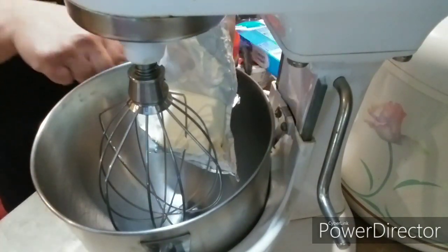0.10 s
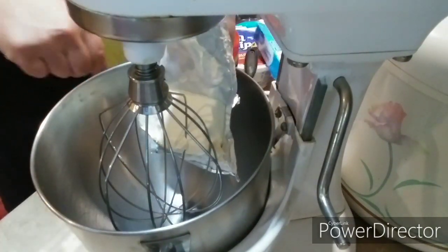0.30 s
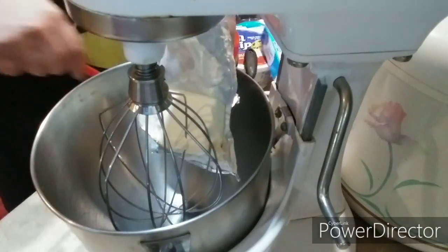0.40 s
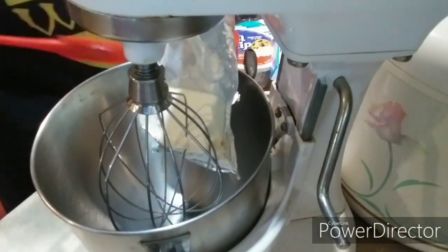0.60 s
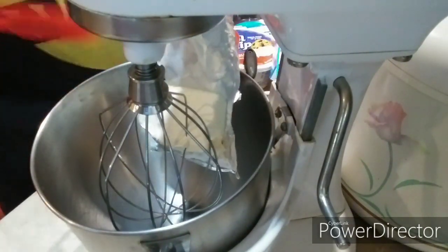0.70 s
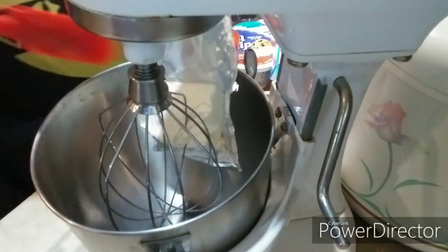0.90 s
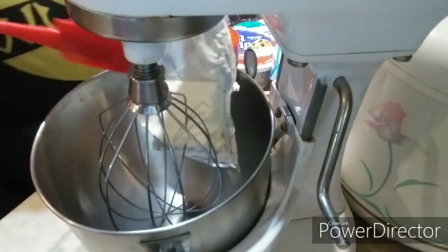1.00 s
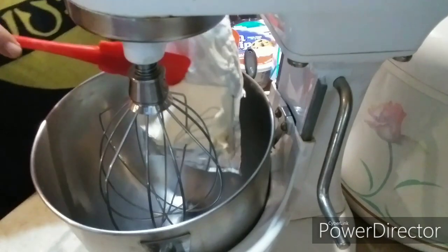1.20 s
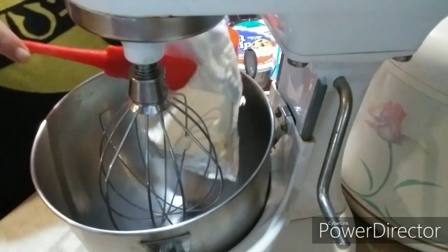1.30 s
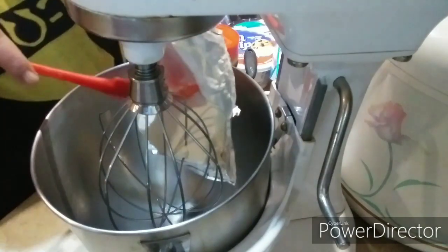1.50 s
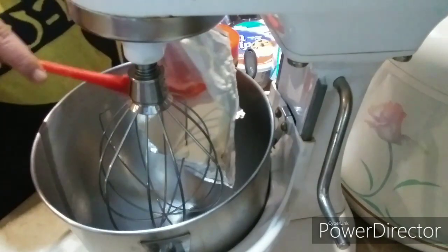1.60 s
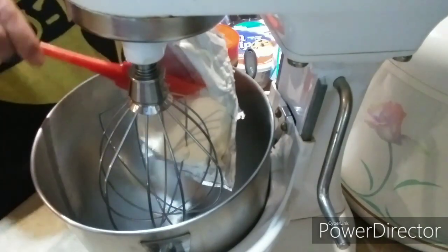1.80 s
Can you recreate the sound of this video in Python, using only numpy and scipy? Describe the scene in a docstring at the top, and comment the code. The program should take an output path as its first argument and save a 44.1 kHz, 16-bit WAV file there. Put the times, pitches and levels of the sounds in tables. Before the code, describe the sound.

Metal utensil set down with two ringing knocks, followed by foil crinkles, small taps and scraping

```python
"""Utensil, worktop and foil wrapper

A steel utensil is put down on a kitchen worktop: one end lands, then the other, each with a rattle and a thin ring.
A spatula pokes into a foil wrapper of soft cheese over a mixing bowl, with small taps, crinkles and a sliding scrape.
Decaying sine modes give the rings, coloured noise bursts the knocks and taps, random impulses and hiss the scrape.
A small room answers; the close microphone has a bright port resonance and a limiter."""
import sys
import numpy as np
from scipy import signal
from scipy.fft import rfft, irfft, next_fast_len
from scipy.io import wavfile
from scipy.ndimage import uniform_filter1d, minimum_filter1d

SR = 44100
rng = np.random.default_rng(int(sys.argv[2]) if len(sys.argv) > 2 else 0)


def wav_record(signal):
    """Record a signal, one row per channel, as 16-bit PCM in the file named by sys.argv[1]."""
    frames = np.transpose(np.atleast_2d(signal))
    bounded = np.clip(frames, -1, 1)
    # unit amplitude maps onto the largest positive 16-bit level
    quanta = np.round(bounded * 32767).astype(np.int16)
    wavfile.write(sys.argv[1], SR, quanta)


N = 79380


def undb(db):
    """Decibel law: an amplitude ratio is 10 to the power of level / 20."""
    return 10 ** (np.asarray(db) / 20)


def add(out, start_s, x):
    """Superposition: sum x into out from a start time on."""
    i = int(start_s * SR)
    out[i:i + len(x)] += x[:len(out) - i]


def fade(t, t60_s):
    """Exponential damping: amplitude is 60 dB down after t60."""
    return np.exp(-np.log(1000) * t / t60_s)


def colour(x, points):
    """Minimum-phase filtering: a causal response whose magnitude passes through (f/Hz, level/dB) points."""
    size = 2 * next_fast_len(len(x))
    hz, db = np.array(points, float).T
    f = np.maximum(np.arange(size // 2 + 1) * SR / size, 1)
    level_db = np.interp(np.log(f), np.log(hz), db)
    cepstrum = irfft(np.log(undb(level_db)))
    # folding the cepstrum onto positive times makes the filter causal
    cepstrum[1:size // 2] *= 2
    cepstrum[size // 2 + 1:] = 0
    response = np.exp(rfft(cepstrum))
    return irfft(rfft(x, size) * response)[:len(x)]


def burst(t, t60_s):
    """Diffuse decay: exponentially damped noise, scaled to unit energy."""
    x = rng.standard_normal(len(t)) * fade(t, t60_s)
    return x / np.sqrt(np.sum(x ** 2))


def ring(t, modes, end, rise_s):
    """Modal superposition: damped sines, weighted by the end that lands, with a gradual onset."""
    waves = np.zeros(len(t))
    for k, (hz, *end_db, t60_s) in enumerate(modes):
        sign = (-1) ** k
        waves += sign * undb(end_db[end]) * np.sin(2 * np.pi * hz * t) * fade(t, t60_s)
    return waves * (1 - np.exp(-t / rise_s))


def slips(per_s):
    """Stick-slip friction: randomly timed impulses of random size and sign, scaled to unit level."""
    happens = rng.random(N) < per_s / SR
    x = happens * rng.standard_normal(N)
    return x / np.std(x)


# spectrum of the background air noise: f/Hz, relative level/dB
AIR_SPECTRUM = [(25, -8), (55, -1), (100, -6.5), (280, 1), (450, 0), (700, -5), (2000, -10), (6000, -20.5),
                (9000, -20.5), (16000, -18.5)]
AIR_DB = -51.5


def room_air():
    """Stationary noise: the quiet, steady background of the kitchen."""
    return undb(AIR_DB) * colour(rng.standard_normal(N), AIR_SPECTRUM)


# strength of the sliding stroke: t/s, level before colouring/dB
STROKE = [(0, -67), (.1, -68.5), (.15, -57.5), (.4, -49), (.66, -57.5), (0.758, -65), (.9, -58), (.97, -61),
          (1.07, -61), (1.21, -53.5), (1.298, -67), (1.359, -45), (1.41, -40.5), (1.51, -43), (1.57, -51),
          (1.62, -55.5), (1.7, -55.5), (1.8, -56.5)]
# spectrum of the sliding friction: f/Hz, gain/dB
FRICTION_SPECTRUM = [(60, -25.5), (180, -4.5), (350, 8), (700, -11), (1030, 5), (1350, -12), (2000, -0.5),
                     (3000, -6), (6400, -8.5), (8700, 1.5), (12000, -9.5), (16000, -11)]
# spectrum of the foil crackle: f/Hz, gain/dB
CRACKLE_SPECTRUM = [(100, -16.5), (350, 4), (1000, 1), (2200, -0.5), (4000, 8), (6500, -10.5), (9000, -7.5),
                    (16000, -18)]
SLIPS_PER_S, HISS_DB = 7500, 3.5  # hiss level relative to the slips
CRACKLES_PER_S, CRACKLE_DB, CRACKLE_T60_S = 390, -10.5, 0.0074


def scrape():
    """Friction excitation: fine slips, hiss and coarser foil crackles, all swelling with the stroke."""
    friction = slips(SLIPS_PER_S) + undb(HISS_DB) * rng.standard_normal(N)
    friction /= np.std(friction)
    one_crackle = burst(np.arange(SR // 20) / SR, CRACKLE_T60_S)
    crackle = signal.fftconvolve(slips(CRACKLES_PER_S), one_crackle)[:N]
    stroke_t, stroke_db = np.array(STROKE).T
    stroke = undb(np.interp(np.arange(N) / SR, stroke_t, stroke_db))
    sliding = colour(friction * stroke, FRICTION_SPECTRUM)
    return sliding + undb(CRACKLE_DB) * colour(crackle * stroke, CRACKLE_SPECTRUM)


# frequencies at which each tap's spectrum is given: f/Hz
TAP_BANDS = [320, 1000, 2200, 6000, 9000]
# taps and crinkles of spatula and wrapper: t/s, then gain/dB at each of TAP_BANDS
TAP_EVENTS = [(0.129, -3, -2, -21, -46, -47), (0.1358, -3, 7, 1.5, -17, -22),
              (0.816, -23, -9.5, -21, -49, -50), (0.8452, -16.5, 3, -1, -19.5, -26),
              (0.903, -16, -8.5, -9.5, -29, -47), (0.922, -9.5, -50, -29, -36, -24),
              (1.001, -26, -32, -22, -29.5, -19.5), (1.0878, -44, -37, -18, -10.5, -4),
              (1.091, -14, 3.5, -10.5, -38, -21.5), (1.1104, -16.5, -28.5, -10, -5.5, 4),
              (1.1142, -9.5, -8, -9.5, -22, -6), (1.187, -11, -15.5, -16, -60, -44),
              (1.240, -15.5, -0.5, -24, -54, -41), (1.248, -4, -37, -4, -15, -14.5),
              (1.342, -19, -13.5, -5.5, -24, -20.5), (1.362, -11.5, -1, -19.5, -26, -45),
              (1.4227, 6.5, 2, 9.5, -1.5, 0.5), (1.438, -5, -5, -15, -12, -17),
              (1.527, -20, -6, 0, -21.5, -33), (1.572, -11.5, -1, -1.5, -20, -52),
              (1.609, -8.5, -22, -31, -41, -48), (1.624, -12, -3.5, -27, -37, -45),
              (1.633, -20, -24, -7, -36, -42), (1.641, -5.5, -7.5, -8, -34, -44),
              (1.6508, 0, 6, 6, -8.5, -5.5), (1.768, -27, -16, -21.5, -31, -24.5)]
# modes of the bowl: f/Hz, level relative to the tap at that pitch/dB, T60/s
BOWL_MODES = [(243.5, -47, 0.16), (370.1, -36.5, 0.099), (1065, -45.5, 0.14), (1625, -49.5, 0.14),
              (2083, -49, 0.14)]
BOWL_RISE_S = 0.002
TAP_TOP_DB = -18  # at 16 kHz, relative to the highest band
TAP_SNAP_DB, TAP_BODY_DB, TAP_T60_S = -17.5, -3, 0.032
ROOM_DB, ROOM_T60_S = -11.5, 0.21
TAP_LOW_CUT_HZ = 164


def taps():
    """Impulse excitation: a snap, a damped rattle and the room's tail, coloured by what is touched; a faint bowl."""
    out, t = np.zeros(N), np.arange(SR // 2) / SR
    for start_s, *band_db in TAP_EVENTS:
        hit = undb(TAP_BODY_DB) * burst(t, TAP_T60_S) + undb(ROOM_DB) * burst(t, ROOM_T60_S)
        hit[0] += undb(TAP_SNAP_DB)
        bowl = np.zeros(len(t))
        for hz, mode_db, t60_s in BOWL_MODES:
            level_db = mode_db + np.interp(hz, TAP_BANDS, band_db)
            bowl += undb(level_db) * np.sin(2 * np.pi * hz * t) * fade(t, t60_s)
        bowl *= 1 - np.exp(-t / BOWL_RISE_S)
        spectrum = [*zip(TAP_BANDS, band_db), (16000, band_db[-1] + TAP_TOP_DB)]
        add(out, start_s, bowl + colour(hit, spectrum))
    low_cut = signal.butter(4, TAP_LOW_CUT_HZ, "highpass", fs=SR, output="sos")
    return signal.sosfilt(low_cut, out)


# landing of each end in turn: t/s, worktop gain/dB, steel gain/dB, low bump level/dB
END_LANDINGS = [(0.2185, -0.5, 3, -41.5), (0.4245, -1, 4.5, -35.5)]
# worktop modes: f/Hz, relative level under the first end/dB, under the second end/dB, T60/s
WORKTOP_MODES = [(346.5, -20.5, -27, 0.26), (373, -37.5, -27, 0.35), (454, -31.5, -30, 0.59),
                 (593.5, -14.5, -25.5, 0.22), (679.5, -20.5, -23.5, .33), (688, -47, -20.5, 0.35),
                 (702, -37.5, -35, 0.67), (946.4, -27.5, -23, 0.43), (1005, -16, -18, 0.33),
                 (1050, -27.5, -22.5, 0.43), (1205, -16, -40, 0.25), (1323, -13.5, -25.5, 0.24),
                 (1370, -21, -15.5, 0.34), (1435, -13, -25.5, 0.25), (1687, -29.5, -16, 0.17),
                 (1856, -22.5, -23, 0.4)]
# steel modes, whose close pairs beat: f/Hz, relative level for the first end/dB, for the second end/dB, T60/s
STEEL_MODES = [(2105, -24, -28, .27), (2298, -30, -17, .33), (2342, -23, -15, .39), (2357, -29, -18, .39),
               (2429, -19, -33, .3), (3042, -38, -31, .25), (3760, -40, -39, .33), (4521, -22, -58, .4),
               (4529.4, -22, -58, .4), (7105, -44, -37, .3), (7150, -43, -40, .31), (8622, -32, -46, .28),
               (8629, -31, -48, .3), (8942, -43, -54, .22), (10160, -44, -52, .16), (10530, -52, -43, .22),
               (10552, -42, -41, .23), (12600, -62, -46, .2)]
WORKTOP_RISE_S, STEEL_RISE_S = 0.0075, 0.016
BUMP_HZ, BUMP_T60_S = 80, 0.066


def utensil_ring():
    """Modal excitation: each landing sets off worktop modes, steel modes and a low bump."""
    out, t = np.zeros(N), np.arange(SR) / SR
    for end, (start_s, worktop_db, steel_db, bump_db) in enumerate(END_LANDINGS):
        worktop = undb(worktop_db) * ring(t, WORKTOP_MODES, end, WORKTOP_RISE_S)
        steel = undb(steel_db) * ring(t, STEEL_MODES, end, STEEL_RISE_S)
        bump = undb(bump_db) * np.sin(2 * np.pi * BUMP_HZ * t) * fade(t, BUMP_T60_S)
        add(out, start_s, worktop + steel + bump)
    return out


# contacts of the utensil: t/s, end that lands (0 or 1), thud gain/dB, crack gain/dB
END_CONTACTS = [(0.2187, 0, -2, -1.5), (0.2274, 0, -5, -17), (0.2454, 0, -38, -12.5),
                (0.4216, 1, -15.5, -13.5), (0.4245, 1, 0, -10), (0.4457, 1, -2, -4), (0.4640, 1, -7.5, -12),
                (0.5070, 1, -27, -19)]
# dense ringing of worktop and room under the first end: f/Hz, relative level/dB
FIRST_END_THUD = [(40, -18.5), (120, -29.5), (220, -12.5), (340, -8), (600, 0), (820, -10), (1400, 0),
                  (1800, -9), (2800, -5), (4200, -12.5), (6000, -21), (8800, -17), (12000, -32.5),
                  (16000, -58.5)]
# dense ringing of worktop and room under the second end: f/Hz, relative level/dB
SECOND_END_THUD = [(40, -33.5), (120, -20.5), (220, -16.5), (340, -6), (600, -4), (820, -8), (1400, -5.5),
                   (1800, -2.5), (2800, -10), (4200, -17.5), (6000, -30), (8800, -26), (12000, -38),
                   (16000, -39.5)]
# spectrum of the sharp crack: f/Hz, relative level/dB
CRACK_SPECTRUM = [(40, -22), (150, -8.5), (500, -7.5), (1500, 8.5), (4000, -4.5), (9000, -20.5),
                  (16000, -28)]
THUD_T60_S, THUD_TREBLE_T60_S, THUD_SPLIT_HZ = 0.37, 0.23, 4000
CRACK_T60_S = 0.03
THUD_LOW_CUT_HZ = 95


def utensil_rattle():
    """Repeated impact: each contact gives a short crack and a thud whose treble dies faster."""
    out, t = np.zeros(N), np.arange(SR) / SR
    split = signal.butter(2, THUD_SPLIT_HZ, fs=SR, output="sos")
    for start_s, end, thud_db, crack_db in END_CONTACTS:
        dense, sharp = rng.standard_normal((2, len(t)))
        low = signal.sosfiltfilt(split, dense)
        treble = dense - low
        thud = low * fade(t, THUD_T60_S) + treble * fade(t, THUD_TREBLE_T60_S)
        thud = colour(thud, SECOND_END_THUD if end == 1 else FIRST_END_THUD)
        crack = colour(sharp * fade(t, CRACK_T60_S), CRACK_SPECTRUM)
        add(out, start_s, undb(thud_db) * thud + undb(crack_db) * crack)
    low_cut = signal.butter(3, THUD_LOW_CUT_HZ, "highpass", fs=SR, output="sos")
    return signal.sosfilt(low_cut, out)


def scene():
    """Linear superposition: the pressures of all sources add at one microphone."""
    return (room_air() + scrape() + taps() + utensil_ring() + utensil_rattle())[None]


PORT_HZ, PORT_Q = 8790, 7.66
PORT_DB = 8  # resonant path, added to the direct sound
LIMIT_DB, LIMIT_S = -3, 0.0016  # ceiling before the top cut, smoothing time of the gain
TOP_HZ = 15600


def record(dry):
    """Resonance, gain control and band limiting: a bright port, a limiter on the peaks, a cut top."""
    port = signal.lfilter(*signal.iirpeak(PORT_HZ, PORT_Q, fs=SR), dry)
    x = dry + undb(PORT_DB) * port
    hold = max(int(LIMIT_S * SR), 2)
    gain = np.minimum(1, undb(LIMIT_DB) / np.maximum(np.abs(x), 1e-9))
    # the lowest gain nearby is held around each peak, then smoothed
    x = x * uniform_filter1d(minimum_filter1d(gain, 2 * hold), hold)
    top_cut = signal.ellip(8, .2, 70, TOP_HZ, fs=SR, output="sos")
    return signal.sosfilt(top_cut, x)


dry = scene()
out = record(dry)
wav_record(out)
```